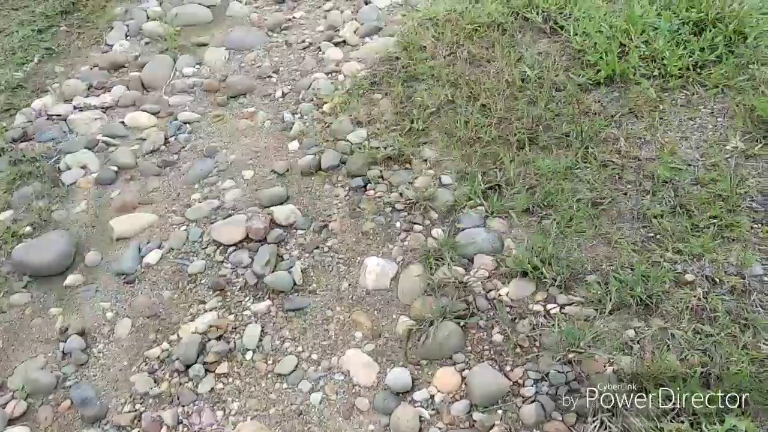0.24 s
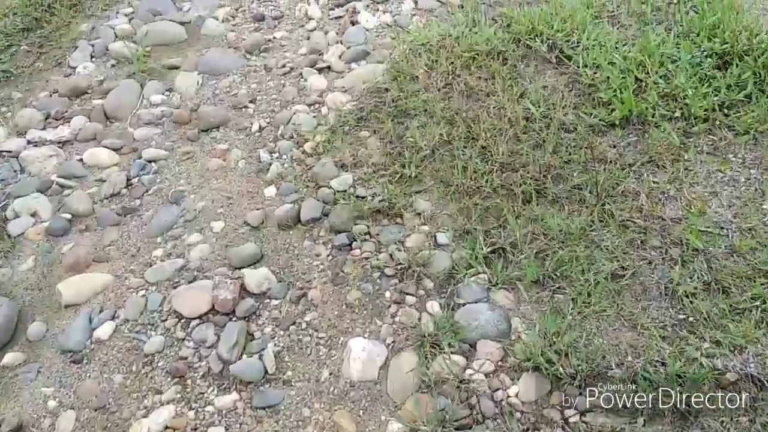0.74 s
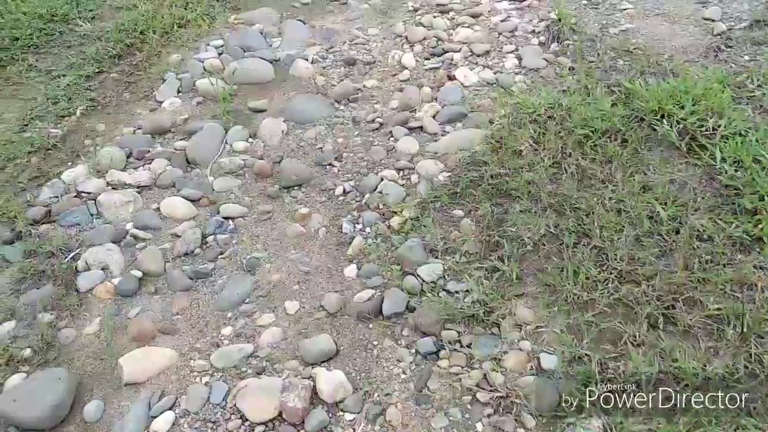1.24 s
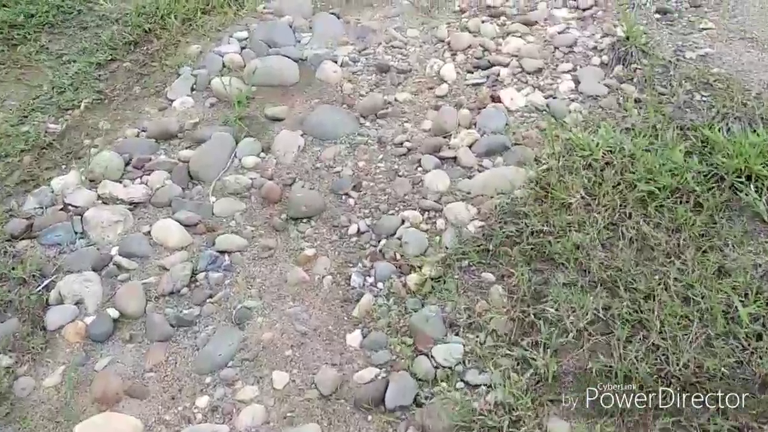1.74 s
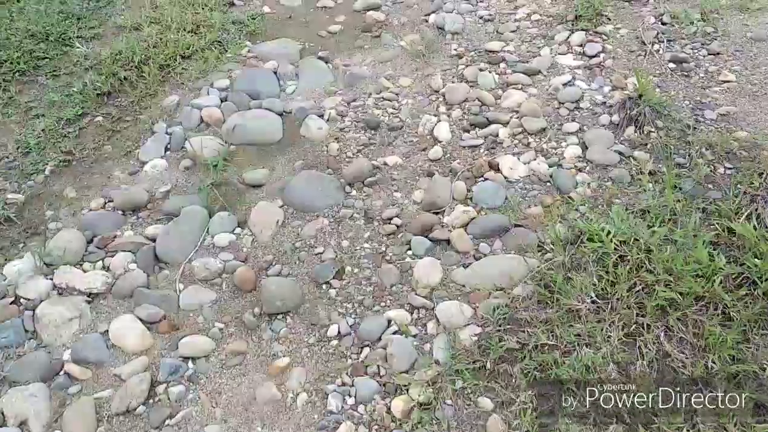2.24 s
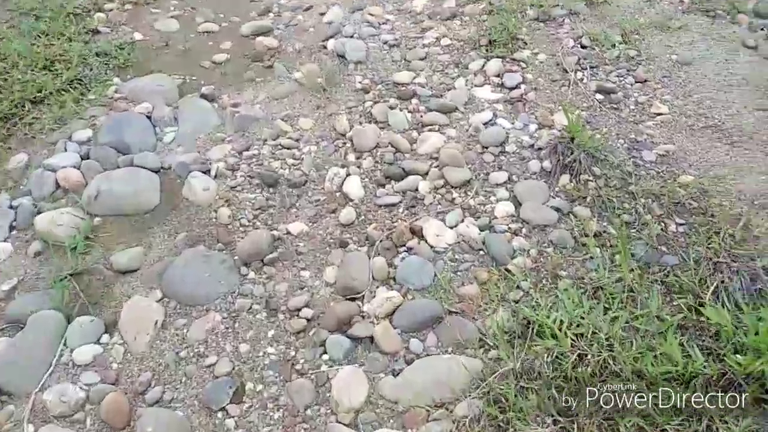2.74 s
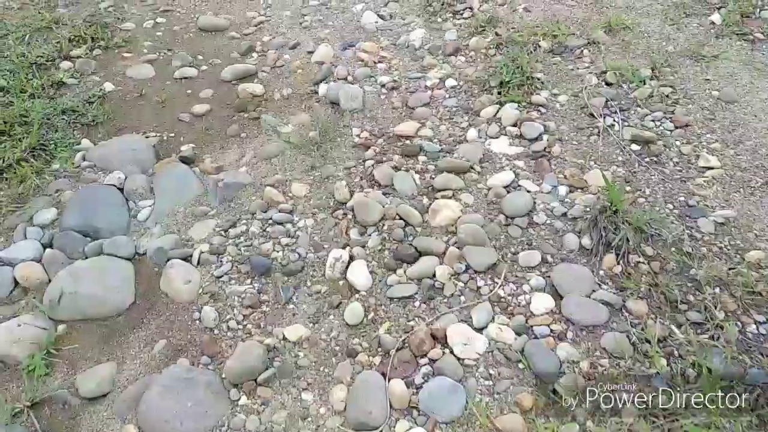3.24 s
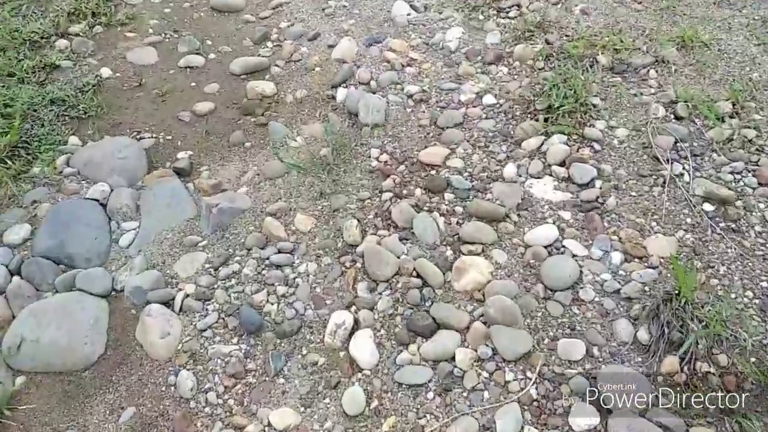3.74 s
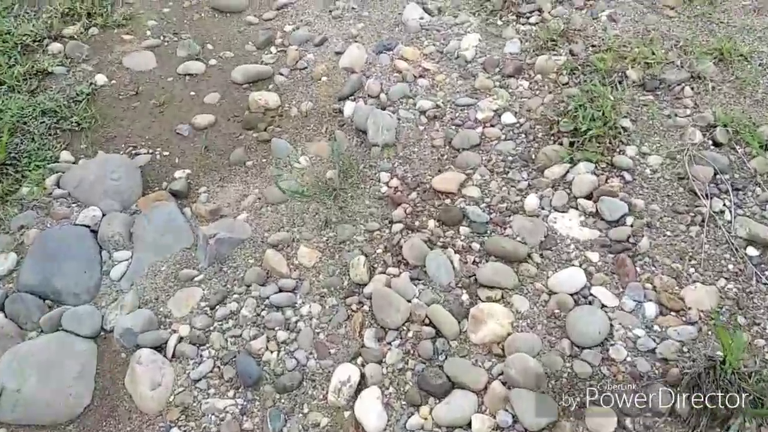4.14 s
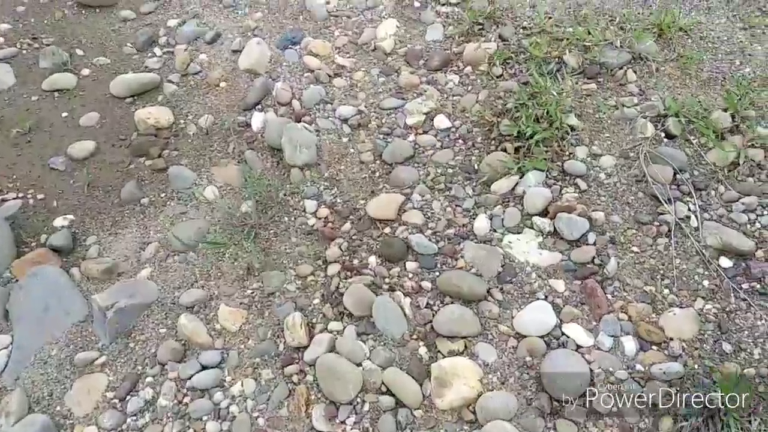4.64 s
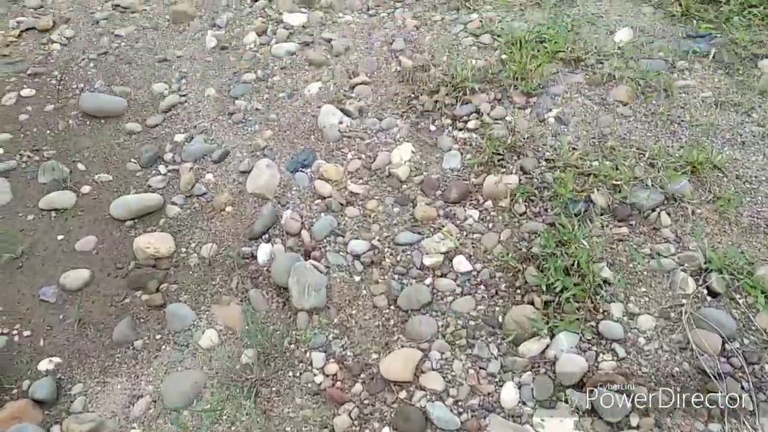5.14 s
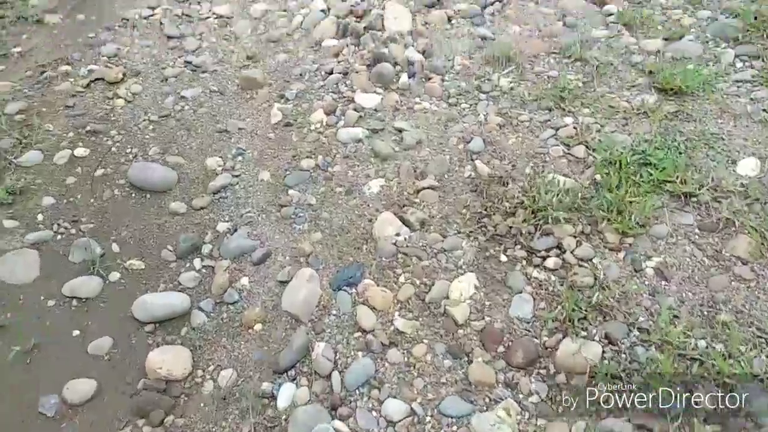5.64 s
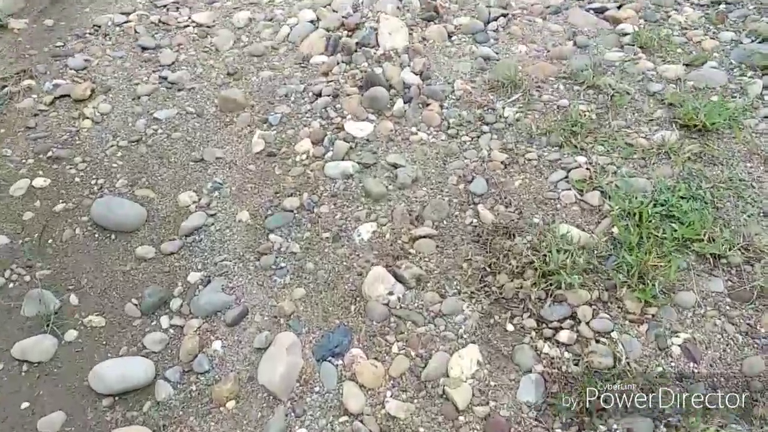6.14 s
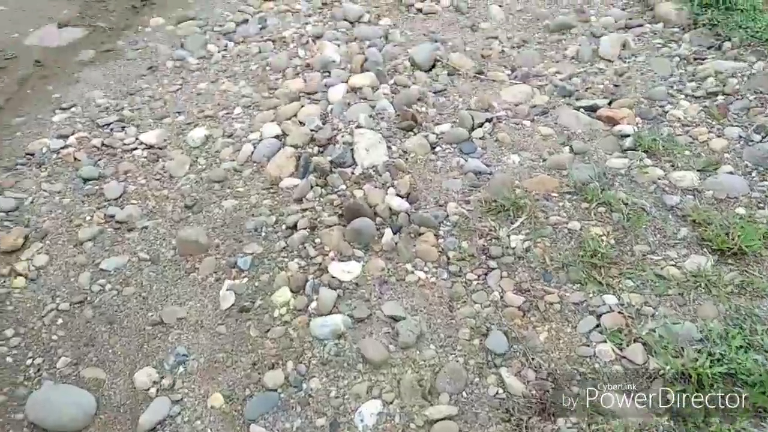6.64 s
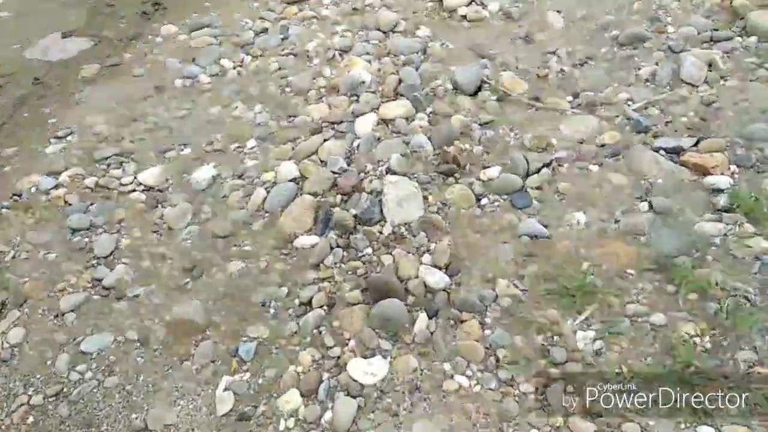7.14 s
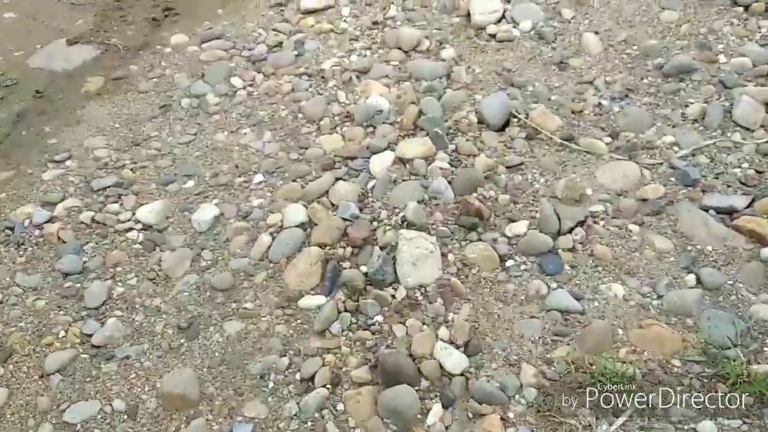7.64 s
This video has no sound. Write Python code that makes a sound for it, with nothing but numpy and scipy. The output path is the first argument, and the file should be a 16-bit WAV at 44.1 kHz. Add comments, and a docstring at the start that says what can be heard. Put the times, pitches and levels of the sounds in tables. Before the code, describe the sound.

Slow footsteps crunch over pebbles and grit, stones clacking and knocking underfoot, while crickets and insects trill, birds chirp and a distant engine drones.

```python
"""Slow steps crunch over a pebbly riverbank: soles tread on grit and drag over sand, pebbles clack, heavy stones
knock. A cricket chirps in pairs among trilling insects, birds call, a far engine slackens and picks up again.
Crunch is dense random grains shaped by weight; clacks are short decaying modes, knocks are resonances struck
by a soft push. Insects and birds are swept sines, the chorus is narrow noise, the engine a few wavering partials.
Low rumble and airy hiss are filtered noise; two microphone ports hear it all with a small lag and shade."""
import sys
import numpy as np
from scipy import signal
from scipy.fft import rfft, irfft, next_fast_len
from scipy.io import wavfile
from scipy.ndimage import uniform_filter1d

SR = 44100
rng = np.random.default_rng(int(sys.argv[2]) if len(sys.argv) > 2 else 0)


def pcm_store(signal):
    """Save signal as 16-bit PCM."""
    levels = np.round(np.clip(np.atleast_2d(signal), -1, 1) * 32767)
    wavfile.write(sys.argv[1], SR, levels.astype(np.int16).T)


N = 347067
TIME = np.arange(N) / SR
PORT_LAG_S = 9e-5  # the right microphone port hears direct sound this much later


def undb(db):
    """Decibels to gain."""
    return 10 ** (np.asarray(db) / 20)


def unit(x):
    """Scale to rms 1."""
    return x / np.sqrt(np.mean(x ** 2))


def peak(x, db):
    """Scale to a peak level."""
    return x * undb(db) / np.abs(x).max()


def add(track, s, sound):
    """Mix a sound into the track from time s on."""
    i = int(s * SR)
    part = sound[max(-i, 0):N - i]
    track[max(i, 0):max(i, 0) + len(part)] += part


def colour(x, points):
    """Filter by a (frequency [Hz], level [dB]) spectrum, joined smoothly over log frequency."""
    hz, db = np.transpose(points)
    size = next_fast_len(x.shape[-1])
    f = np.maximum(np.fft.rfftfreq(size, 1 / SR), 1)
    gain = undb(np.interp(np.log(f), np.log(hz), db))
    return irfft(rfft(x, size) * gain, size)[..., :x.shape[-1]]


def colour_rms(x, points):
    """Filter by a spectrum and scale to rms 1."""
    return unit(colour(x, points))


def ring(x, hz, width_hz):
    """One resonance, gain 1 at its centre."""
    return signal.lfilter(*signal.iirpeak(hz, hz / min(width_hz, SR / 4), fs=SR), x)


def walk(rate):
    """Smooth random drift with a spread near 1, passing `rate` random knots a second."""
    knots = rng.standard_normal(4096)
    return np.interp(TIME * rate, np.arange(len(knots)), knots)


def grains(rate, spread_db):
    """Tiny fractures, many weak and few strong, of even power at any rate: rows direct, diffuse left and right."""
    size = undb(spread_db * np.minimum(rng.exponential(size=(3, N)), 5)) / np.sqrt(rate)
    breaks = rng.random((3, N)) < rate / SR
    return breaks * size * rng.choice([-1, 1], (3, N))


def ports(x, diffuse, lag_s):
    """The right port hears the direct sound later, and everything duller; diffuse sound may differ in the two."""
    # the right port faces away: (frequency [Hz], level against the left [dB])
    shade = [(250, -0.5), (600, 1), (2200, -1.5), (4400, -4.5), (8000, -10.5), (11000, -2), (15000, -3)]
    left, right = np.array([x, np.interp(TIME - lag_s, TIME, x)]) + diffuse
    return np.array([left, colour(right, shade)])


def scattered(x, scatter_db, scatter_s, lag_s=PORT_LAG_S):
    """Direct sound at both ports, with a decaying noise tail thrown back by the stony ground."""
    t = TIME[:8192]
    tail = rng.standard_normal((2, len(t))) * np.exp(-t / scatter_s)
    tail *= undb(scatter_db) / np.sqrt(np.sum(tail ** 2, axis=1, keepdims=True))
    return ports(x, signal.fftconvolve(x[None], tail, axes=1)[:, :N], lag_s)


def soles(grit_db=-4, crumb_db=2.0, sand_db=-2, diffuse_db=4, slip_db=2.5, full_db=-50.5):
    """Each contact crushes coarse grit and crumbs and drags fine sand, in uneven slips; more weight, denser grains."""
    # spectra of the three grain sizes: (frequency [Hz], relative level [dB])
    grit_spectrum = [(250, -18), (600, -19), (1100, -6), (1800, 4.5), (3000, 10), (4500, 9), (7000, -40),
                     (10000, -27), (16000, -38)]
    crumb_spectrum = [(2500, -8), (4500, -3), (6300, 7), (7500, 3), (9500, 8), (12000, -7.5), (16000, -13)]
    sand_spectrum = [(2000, -24.5), (5500, -5), (7500, 0.5), (9500, 1), (11500, 2.5), (13000, 1),
                     (17000, -3)]
    coarse, fine = footwork()
    # at full_db the grains reach their nominal rate; lighter contact breaks fewer
    weight, drag = np.clip(np.array([coarse, fine]) / undb(full_db), .25, 3)
    coarse_grains = colour_rms(grains(rate=1300 * weight, spread_db=1.5), grit_spectrum)
    grit = coarse * (undb(grit_db) * coarse_grains + chips(weight))
    # middle-sized crumbs follow both the pressure and the drag
    crumb_grains = colour_rms(grains(rate=1100 * weight, spread_db=3.7), crumb_spectrum)
    crumbs = np.sqrt(coarse * fine) * undb(crumb_db) * crumb_grains
    sand_grains = colour_rms(grains(rate=1700 * drag, spread_db=3.2), sand_spectrum)
    sand = fine * undb(sand_db) * sand_grains
    crunch = (grit + crumbs + sand) * undb(slip_db * walk(110))
    return ports(crunch[0], undb(diffuse_db) * crunch[1:], PORT_LAG_S)


def footwork(attack_s=.008, release_s=0.045, drag_swell=0.71):
    """Strength of coarse and fine crunch: a tread rises fast, holds and dies away; a drag swells and fades."""
    # the foot bears down and the gravel gives:
    # (time [s], hold [s], coarse grit strength [dB], fine sand strength [dB])
    treads = [(0.736, 0.037, -46.5, -42.5), (1.258, .012, -59, -67), (1.56, 0.015, -58, -46),
              (2.704, 0.012, -57, -45), (3.173, 0.0032, -58.5, -52.5), (3.42, 0.019, -51.5, -42.5),
              (4.263, .005, -64, -51.5), (5.078, 0.014, -59, -49.5), (6.369, 0.0038, -51.5, -49),
              (6.441, 0.0035, -59, -47), (6.723, 0.016, -55.5, -57), (7.114, 0.016, -45, -45),
              (7.26, 0.0035, -53, -57), (7.315, 0.0021, -57, -49.5)]
    # the sole drags over the ground:
    # (start [s], length [s], coarse grit strength [dB], fine sand strength [dB])
    drags = [(0.788, 0.13, -67, -48), (1.085, 0.28, -62.5, -56.5), (1.596, 0.125, -60.5, -51),
             (2.626, 0.22, -52, -54), (2.798, 0.227, -60.5, -61), (3.19, 0.42, -67, -50),
             (3.588, 0.17, -70, -51), (3.88, 0.39, -92, -50), (4.223, 0.31, -70, -50.5),
             (4.559, 0.62, -82, -49.5), (4.7, 0.3, -84, -42.5), (6.245, 0.39, -59, -50),
             (6.8, 0.38, -58.5, -65), (7.684, 0.19, -78, -55)]
    power = np.zeros((2, N))
    for s, hold_s, coarse_db, fine_db in treads:
        rise = np.clip(1 + (TIME - s) / attack_s, 0, 1)
        press = rise * np.exp(-np.maximum(TIME - s - hold_s, 0) / release_s)
        power += (undb([[coarse_db], [fine_db]]) * press) ** 2
    for s, length_s, coarse_db, fine_db in drags:
        half_sine = np.abs(np.sin(np.linspace(0, np.pi, int(length_s * SR))))
        slide = half_sine ** drag_swell  # a lower power swells flatter
        for track, db in zip(power, [coarse_db, fine_db]):
            add(track, s, (undb(db) * slide) ** 2)
    return np.sqrt(power)


def chips(weight, spread_db=2.5, shift_db=2.5):
    """Pebbles of three sizes tick as the foot presses; now one size leads, now another."""
    # small pebbles under the sole: (frequency [Hz], width [Hz], mean level [dB])
    sizes = [(1570, 2600, -8), (2350, 700, -13.5), (4100, 1200, -5.5)]
    out = 0
    for hz, width_hz, db in sizes:
        level = undb(db + shift_db * walk(45))
        out = out + level * unit(ring(grains(rate=350 * weight, spread_db=spread_db), hz, width_hz))
    return out


def scrapes(width_share=1.15, slip_db=2.5):
    """A broad, rough band of friction noise whose pitch, width and strength follow the sliding speed."""
    # a sole sliding across a stone: (time [s], length [s], start pitch [Hz], end pitch [Hz], level [dB])
    slides = [(1.22, .11, 900, 1400, -62), (5.012, 0.04, 550, 1300, -61), (5.045, .07, 2500, 3800, -52),
              (6.965, 0.11, 2900, 1500, -63)]
    out = np.zeros(N)
    for s, length_s, start_hz, end_hz, db in slides:
        u = np.linspace(0, 1, int(length_s * SR))
        hz = start_hz + (end_hz - start_hz) * u
        cycles = np.cumsum(hz) / SR
        # two random bumpy curves modulate sine and cosine into a noise band
        bumps = rng.standard_normal((2, 1024))
        a, b = (np.interp(width_share * cycles, np.arange(len(row)), row) for row in bumps)
        band = a * np.sin(2 * np.pi * cycles) + b * np.cos(2 * np.pi * cycles)
        rough = band * undb(slip_db * walk(340)[:len(u)])
        swell = np.sqrt(np.abs(np.sin(np.pi * u)) * hz / hz.mean())
        add(out, s, undb(db) * swell * rough)
    return scattered(out, scatter_db=4, scatter_s=0.0031)


def thumps():
    """The damp soil gives under the settling body weight with a soft, dull swell of noise."""
    # body weight settling: (time [s], length [s], level [dB])
    settlings = [(4.232, 0.21, -42), (6.693, 0.16, -42.5), (7.325, 0.068, -42)]
    # spectrum of damp soil: (frequency [Hz], relative level [dB])
    soil = [(40, -36), (90, 0), (150, 6.5), (250, -1.5), (450, -16.5), (900, -50), (2500, -56)]
    weight = np.zeros(N)
    for s, length_s, db in settlings:
        add(weight, s, undb(db) * np.hanning(int(length_s * SR)))
    dull = weight * colour_rms(rng.standard_normal(N), soil)
    return ports(dull, 0, PORT_LAG_S)


def cracks(crack_s=.00032):
    """Single grit grains burst in a fraction of a millisecond, nearly all treble."""
    # grains bursting under the sole: (time [s], peak level [dB])
    bursts = [(0.8033, -17), (0.81, -17), (0.828, -22), (0.8393, -18), (0.8578, -19), (0.923, -29),
              (1.188, -28), (1.466, -19), (1.823, -28), (2.6847, -18), (2.7589, -19), (2.833, -26),
              (2.8448, -14), (4.875, -23), (4.933, -23), (5.7544, -30), (7.3348, -15)]
    # spectrum of a burst: (frequency [Hz], relative level [dB])
    burst_spectrum = [(2000, -24), (5000, -12), (9000, 10), (13000, 10), (15500, 10)]
    out, t = np.zeros(N), TIME[:256]
    for s, db in bursts:
        hiss = colour(rng.standard_normal(len(t)), burst_spectrum)
        add(out, s, peak(hiss * np.exp(-t / crack_s), db))
    return scattered(out, scatter_db=-10, scatter_s=0.0033)


def pebbles(swell_cycles=.8, fade_cycles=1.05, ring_db=-19, ring_cycles=4, upper_ratio=2.69,
            onset_s=0.0005, snap_s=0.0005, rasp_s=0.0016, rasp_db=-22):
    """Stone on stone, straight below: a clack of about two cycles with a faint ring, a bright snap, a brief rasp."""
    # pebbles striking each other: (time [s], clack level [dB], clack pitch [Hz],
    # upper mode level against the clack [dB], snap peak level [dB])
    strikes = [(0.5944, -46, 3078, -10, -32), (1.1982, -44, 1480, -15, -36), (1.278, -41, 2100, -12, -42),
               (1.316, -44, 1600, -10, -29), (1.4001, -33, 1360, -3.5, -26), (1.4015, -45, 1390, -3, -30),
               (1.4662, -30.5, 1390, -2, -21), (1.4682, -39, 1440, -2, -29), (1.617, -50, 1700, -2, -33),
               (1.7036, -32, 2780, -14, -25), (2.148, -43, 3000, -10, -25.5), (2.2122, -29, 5000, -10, -20),
               (2.6421, -22.5, 3950, -8, -18.5), (2.6847, -20, 5360, -8, -19),
               (2.7253, -24, 2060, -10, -21), (2.728, -38, 1700, -8, -26), (2.742, -11.5, 2060, -16, -13),
               (2.7583, -16.5, 2170, -11, -15), (2.7666, -15.5, 2270, -20, -16),
               (2.7694, -15, 2200, -20, -15), (2.807, -36, 1540, -2, -40), (2.8262, -32, 1510, -1, -24),
               (2.8464, -21.5, 2290, -9, -17), (2.877, -23, 2380, -10, -13), (2.8798, -27, 1980, -3, -20),
               (2.8862, -22, 2900, -10, -15), (2.889, -22, 2600, -3, -16.5), (2.8963, -37, 3600, -10, -20),
               (2.9524, -35, 3540, -10, -24.5), (3.189, -48, 1700, 2, -37), (3.4254, -26, 3930, -10, -27),
               (3.591, -39.5, 1600, -8, -31), (4.2792, -48, 1903, -3, -34), (4.439, -37, 3580, -10, -28.5),
               (4.61, -39, 3380, -8, -30), (6.2378, -45.5, 1252, -8, -35), (6.3773, -27, 4477, -10, -34),
               (6.384, -40, 2600, -7, -36), (6.45, -42, 3390, -9, -32), (6.546, -46, 3220, -5, -30),
               (6.9243, -45, 1293, -13, -40), (6.943, -40, 1398, -10, -36), (7.0455, -34.5, 1500, -10, -42),
               (7.054, -34, 1500, -10, -42), (7.118, -34, 1550, -10, -35), (7.121, -26.5, 1540, -8, -17.5),
               (7.128, -32, 1700, -1, -17), (7.14, -40, 1940, -10, -30), (7.15, -30, 1700, -10, -23),
               (7.2125, -24.5, 3500, -20, -31), (7.335, -42, 2494, -10, -16), (7.364, -38, 1490, -3, -46),
               (7.566, -40, 2020, -6, -31)]
    # spectrum of the snap: (frequency [Hz], relative level [dB])
    snap_spectrum = [(1000, -7.5), (3000, -4), (4200, 0), (5300, -6.5), (7200, 12), (9200, 4.5), (11300, 2),
                     (13000, -15), (15500, -24.5)]
    out, lead = np.zeros(N), 128  # samples before the clack's peak
    t = TIME[:1024] - lead / SR
    after = np.maximum(t, 0)
    onset = np.exp((t - after) / onset_s)  # soft rise before the snap's peak
    envelope = onset * (np.exp(-after / snap_s) + undb(rasp_db) * np.exp(-after / rasp_s))
    for s, clack_db, pitch_hz, upper_db, snap_db in strikes:
        cycles = t * pitch_hz
        jolt = np.exp(-(cycles / np.where(t < 0, swell_cycles, fade_cycles)) ** 2)
        faint_ring = undb(ring_db) * (1 - jolt) * (t > 0) * np.exp(-np.abs(cycles) / ring_cycles)
        upper = undb(upper_db) * np.sin(2 * np.pi * upper_ratio * cycles)
        clack = np.cos(2 * np.pi * cycles) + upper
        snap = peak(colour(rng.standard_normal(len(t)), snap_spectrum) * envelope, snap_db)
        add(out, s + t[0], snap - undb(clack_db) * (jolt + faint_ring) * clack)
    return scattered(out, scatter_db=-9, scatter_s=0.008, lag_s=2e-5)


def knocks(push_s=0.00026, damping=0.73, ground_hz=125, ground_width_hz=35):
    """A heavy stone drops back into its bed: a soft push jolts the stone and rings the ground."""
    # stones rocking under the heel: (time [s], stone peak level [dB], pitch [Hz], ground peak level [dB])
    drops = [(1.277, -42, 1100, -58), (1.579, -38, 630, -52), (1.586, -38, 600, -52),
             (6.6894, -41, 750, -52), (6.7694, -39, 520, -48), (7.2124, -31.5, 1100, -50),
             (7.336, -31.5, 800, -41), (7.3395, -33, 620, -43), (7.3635, -25, 350, -34)]
    out, t = np.zeros(N), TIME[:4096]
    push = t * np.exp(-t / push_s)
    for s, stone_db, hz, ground_db in drops:
        stone = peak(ring(push, hz, damping * hz), stone_db)  # damping is width over pitch
        ground = peak(ring(push, ground_hz, ground_width_hz), ground_db)
        add(out, s, stone + ground)
    return scattered(out, scatter_db=-3, scatter_s=0.0048)


def cricket(hz=8160, detune_hz=9, sag_hz=170, period_s=.207, pulse_s=.042, gap_s=0.047, second_db=0):
    """Two wing strokes a chirp, evenly repeated in bouts; the pitch tops out just past the middle of each stroke."""
    # bouts of chirping: (first chirp [s], end of the bout [s])
    bouts = [(0.0, 3.4), (3.572, 4.37), (5.532, 6.05), (6.195, 7.75)]
    # cricket level, rising and falling, fainter towards the end, before a small random change per chirp:
    # (time [s], level [dB])
    loudness = [(0, -38.5), (1.0, -38), (1.5, -35), (2.1, -35.5), (2.4, -40), (2.9, -33.5), (3.35, -42),
                (3.95, -35), (4.3, -44), (7.87, -45)]
    out, u = np.zeros(N), np.linspace(-1, 1, int(pulse_s * SR))
    times = np.concatenate([np.arange(first_s, end_s, period_s) for first_s, end_s in bouts])
    levels = np.interp(times, *np.transpose(loudness)) + rng.standard_normal(len(times))
    detunings = detune_hz * rng.standard_normal((len(times), 2))
    for s, db, detune in zip(times, levels, detunings):
        for k, stroke_db in enumerate([db, db + second_db]):
            pitch_hz = hz + detune[k] - sag_hz * (u ** 2 - u / 2)
            tone = np.sin(2 * np.pi * np.cumsum(pitch_hz) / SR)
            add(out, s + k * gap_s - pulse_s / 2, undb(stroke_db) * np.cos(u * np.pi / 2) ** 2 * tone)
    return scattered(out, scatter_db=-21, scatter_s=0.042)


def triller(hz=7620, strokes_hz=61.7, db=-51, fade_db_per_s=.4, uneven_db=1.5):
    """One insect trills without a pause: fast wing strokes, each a short pure pip."""
    strokes = np.sin(np.pi * np.cumsum(strokes_hz * (1 + .004 * walk(3))) / SR) ** 4
    tone = np.sin(2 * np.pi * np.cumsum(hz * (1 + .006 * walk(120))) / SR)
    trill = unit(strokes * tone) * undb(db - fade_db_per_s * TIME + uneven_db * walk(40))
    return scattered(trill, scatter_db=-6, scatter_s=.012)


def ticker(first_s=.066, period_s=.1277, pip_s=.016, start_hz=7130, end_hz=6850, db=-49.5):
    """A fainter insect repeats one short falling pip, at slightly uneven levels."""
    out, u = np.zeros(N), np.linspace(0, 1, int(pip_s * SR))
    hz = start_hz + (end_hz - start_hz) * u
    pip = np.sin(np.pi * u) * np.sin(2 * np.pi * np.cumsum(hz) / SR)
    for s in np.arange(first_s, N / SR, period_s):
        add(out, s, undb(db + 2 * rng.standard_normal()) * pip)
    return scattered(out, scatter_db=-10, scatter_s=.012)


def birds(waver=0.008, flutter_db=2.5, gain_db=-3.5):
    """Thin slurred whistles from across the bank, with a faint, long echo."""
    # bird notes: (time [s], length [s], start pitch [Hz], middle pitch [Hz], end pitch [Hz],
    # level before the common gain and flutter [dB])
    notes = [(0.48, .04, 5500, 5050, 4850, -49), (0.845, 0.04, 5130, 6350, 7000, -39),
             (1.013, 0.06, 4850, 5900, 7200, -43), (1.095, .045, 3250, 3100, 2900, -52),
             (1.562, .035, 7000, 5860, 5540, -42), (2.262, .05, 6100, 5400, 4700, -47),
             (3.198, .03, 4900, 5630, 6000, -44), (3.22, 0.037, 4900, 6600, 6800, -39),
             (3.364, .03, 4740, 5600, 6000, -42), (3.388, 0.045, 5120, 6630, 6800, -39),
             (4.42, .055, 5650, 5200, 5000, -48), (4.815, .15, 3420, 3290, 2550, -45),
             (5.025, .06, 5700, 5200, 5050, -46), (5.214, .055, 5596, 5171, 4800, -47.5),
             (5.232, .055, 3130, 3080, 2500, -46.5), (6.552, .035, 5400, 6200, 6900, -42),
             (6.71, .038, 5200, 6100, 6800, -43), (6.98, .05, 3250, 3080, 2700, -48)]
    out = np.zeros(N)
    for s, length_s, start_hz, middle_hz, end_hz, db in notes:
        u = np.linspace(0, 1, int(length_s * SR))
        slur = np.polyfit([0, .5, 1], [start_hz, middle_hz, end_hz], 2)
        hz = np.polyval(slur, u) * (1 + waver * walk(150)[:len(u)])
        level = undb(db + gain_db + flutter_db * walk(160)[:len(u)])
        swell = np.sqrt(np.abs(np.sin(np.pi * u)))
        add(out, s, level * swell * np.sin(2 * np.pi * np.cumsum(hz) / SR))
    return scattered(out, scatter_db=-6, scatter_s=.07)


def chorus(flutter_db=1.5, diffuse_db=-2):
    """Many insects in the grass merge into a fluttering high band of noise."""
    # insect bands: (frequency [Hz], width of each of two filter passes [Hz], mean level [dB])
    bands = [(7585, 470, -53), (7320, 680, -58), (7984, 110, -55.5)]
    out = 0
    for hz, width_hz, db in bands:
        once = ring(rng.standard_normal((3, N)), hz, width_hz)
        band = unit(ring(once, hz, width_hz))
        out = out + band * undb(db + flutter_db * walk(55) + 0.7 * walk(0.69))
    return ports(out[0], undb(diffuse_db) * out[1:], PORT_LAG_S)


def engine(waver_db=2.5, start_db=-49.5, nears_db_per_s=0.72, speed_db_per_octave=14, throttle_db_per_hz_s=.1):
    """Only the lowest exhaust partials carry this far, each wavering on the way; speed and throttle set the level."""
    # engine speed: (time [s], firing rate [Hz])
    speed = [(0.0, 105.7), (2.21, 107.3), (2.63, 102.3), (3.13, 76.1), (3.88, 63.7), (4.4, 69.56),
             (4.69, 85.35), (5.0, 96.7), (5.24, 103.7), (7.87, 99.3)]
    # exhaust partials: (multiple of the firing rate, mean relative level [dB])
    partials = [(1, 0), (4 / 3, -12.5), (5 / 3, -18.5), (1.6, -14), (2, -18)]
    hz = np.interp(TIME, *np.transpose(speed))
    throttle = uniform_filter1d(np.gradient(hz, TIME), size=SR // 4)  # speeding up, Hz per second
    db = start_db + nears_db_per_s * TIME  # level at full speed, growing slowly
    db = db + speed_db_per_octave * np.log2(hz / hz.max()) + throttle_db_per_hz_s * throttle
    phase = 2 * np.pi * np.cumsum(hz * (1 + 0.0098 * walk(12))) / SR
    drone = sum(undb(order_db + waver_db * walk(9)) * np.sin(k * phase) for k, order_db in partials)
    return ports(unit(drone) * undb(db), 0, PORT_LAG_S)


def outdoors(rumble_db=-48.5, rumble_rise_db_per_s=0.1129, swirl_db=-9, air_db=-52.5, air_left_db=1):
    """Low rumble nearly alike in both ports, and a faint airy hiss that is not."""
    # background spectra: (frequency [Hz], relative level [dB])
    rumble_spectrum = [(25, -47), (40, -24), (60, -14.5), (80, 2.5), (130, -1.5), (200, -7.5), (310, -9.5),
                       (420, -17), (550, -25.5), (1000, -34.5), (3000, -26), (6000, -42)]
    air_spectrum = [(130, -28), (400, 5.5), (700, 7.5), (1300, 6), (2400, 1.5), (4100, 8.5), (5500, 5.5),
                    (8500, 7.5), (11000, 8.5), (13000, 3), (15300, 7), (17000, -30)]
    rumble = colour_rms(rng.standard_normal((3, N)), rumble_spectrum)
    rumble = rumble * undb(rumble_db + rumble_rise_db_per_s * TIME)
    air = colour_rms(rng.standard_normal((2, N)), air_spectrum)
    air = air * undb(air_db + 1.6 * walk(7) + 1.6 * walk(40))
    air = air * undb([[air_left_db], [-air_left_db]])
    return ports(rumble[0], undb(swirl_db) * rumble[1:] + air, PORT_LAG_S)


def scene():
    """Feet and stones up close, the riverbank around them."""
    feet = soles() + scrapes() + thumps() + cracks() + pebbles() + knocks()
    wildlife = cricket() + triller() + ticker() + birds() + chorus()
    return feet + wildlife + engine() + outdoors()


def record(dry, top_hz=15750):
    """A steep low-pass leaves nothing above the top frequency."""
    return signal.sosfilt(signal.ellip(10, .2, 70, top_hz, fs=SR, output="sos"), dry)


dry = scene()
out = record(dry)
pcm_store(out)
```